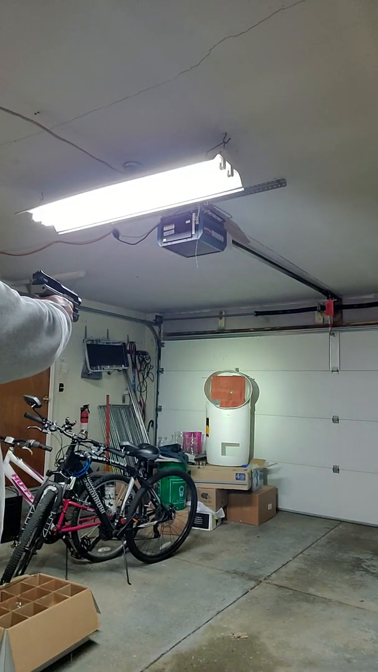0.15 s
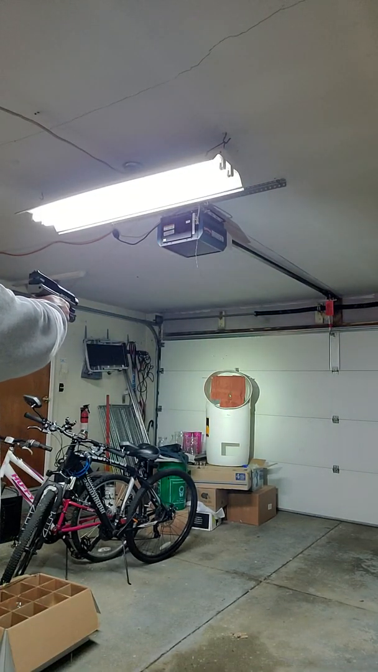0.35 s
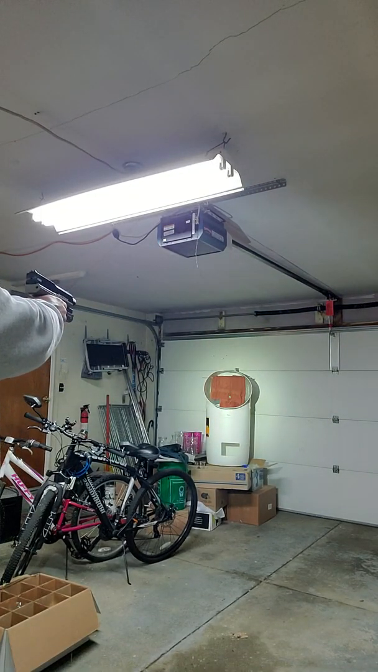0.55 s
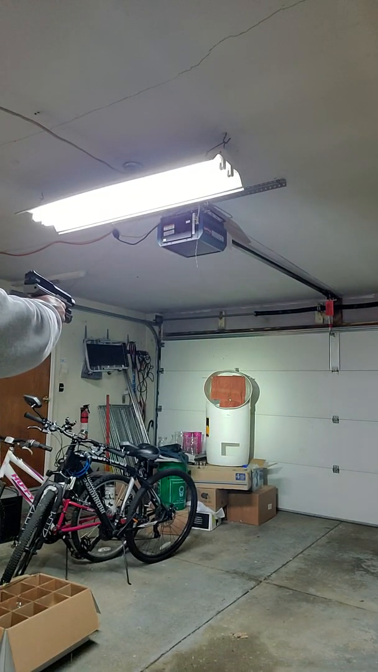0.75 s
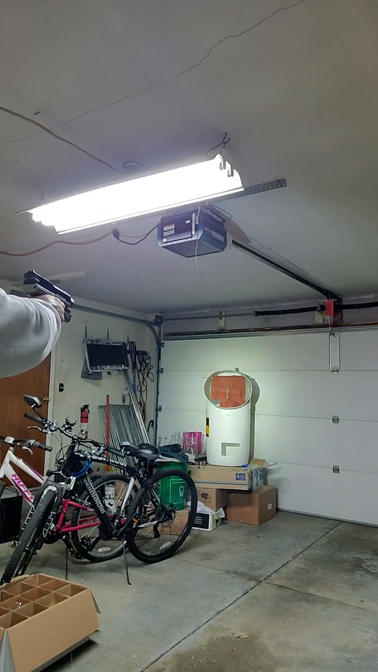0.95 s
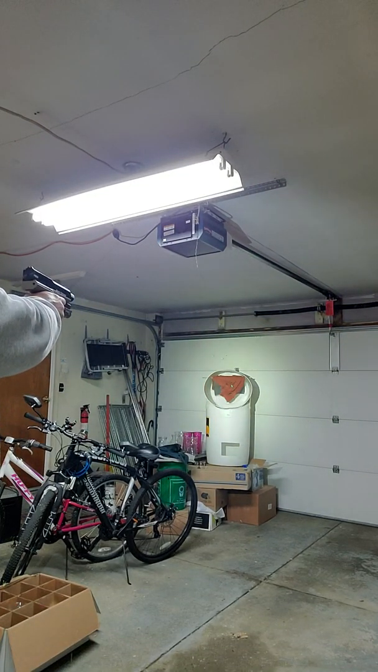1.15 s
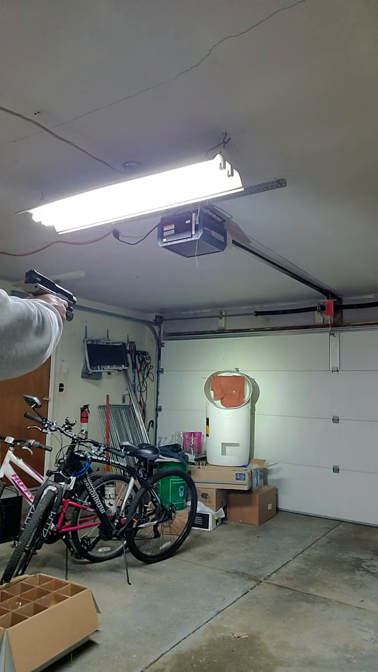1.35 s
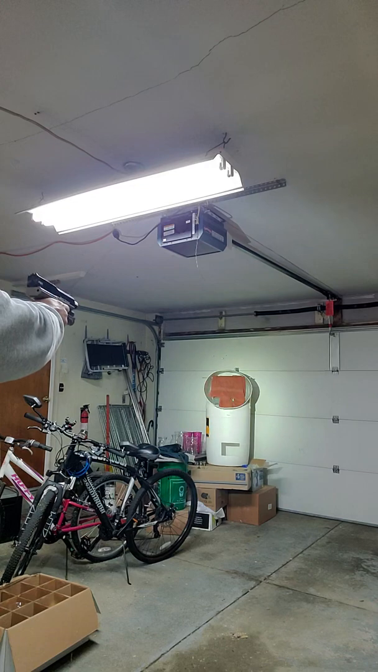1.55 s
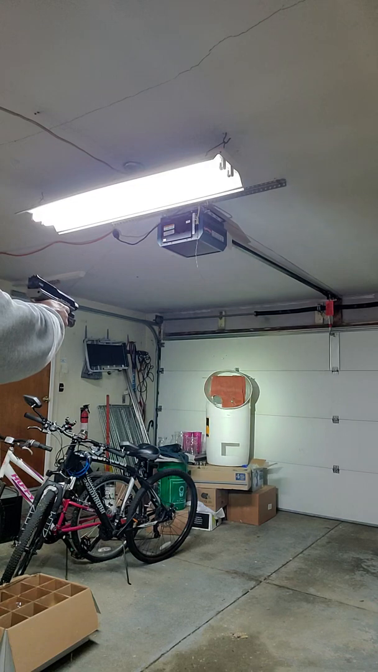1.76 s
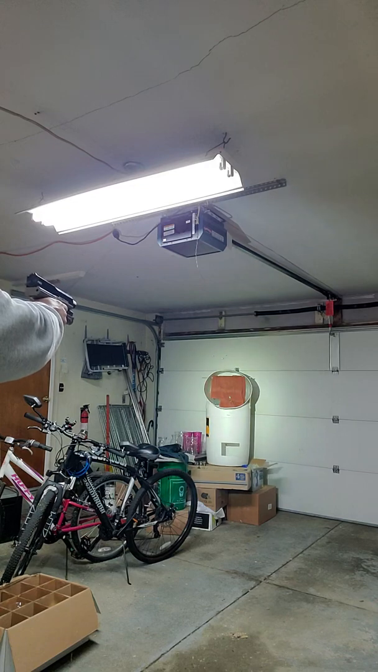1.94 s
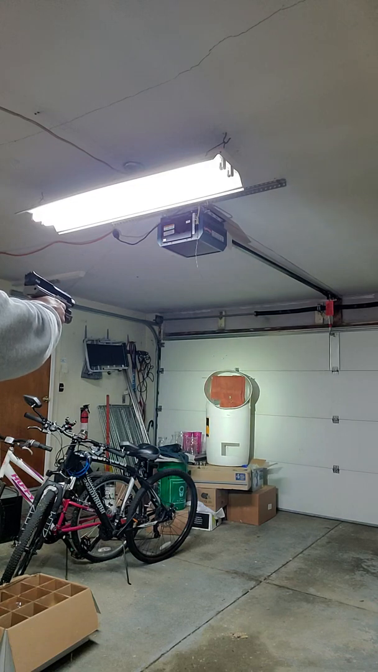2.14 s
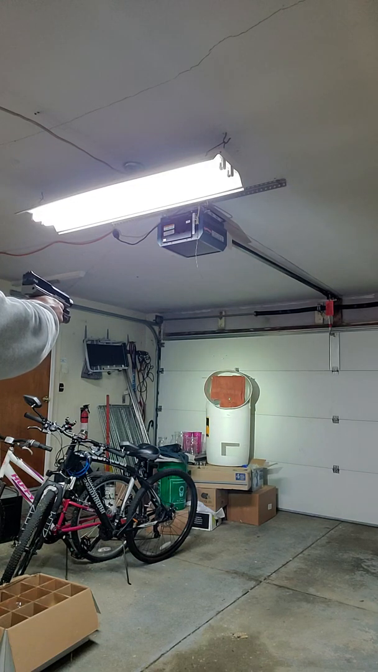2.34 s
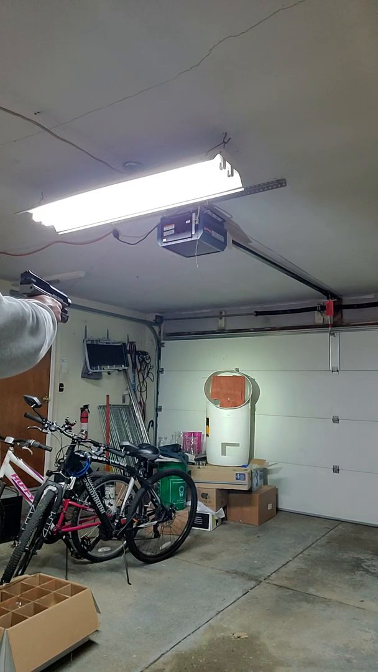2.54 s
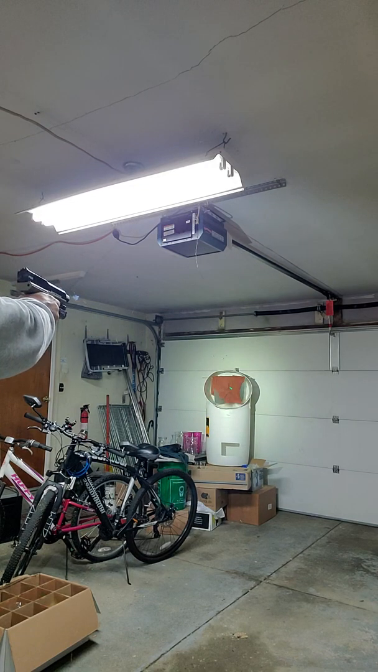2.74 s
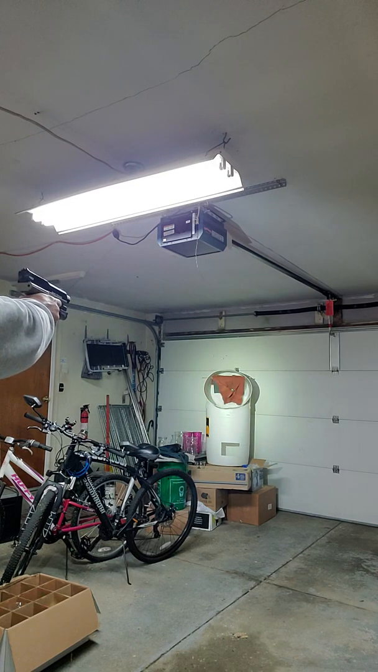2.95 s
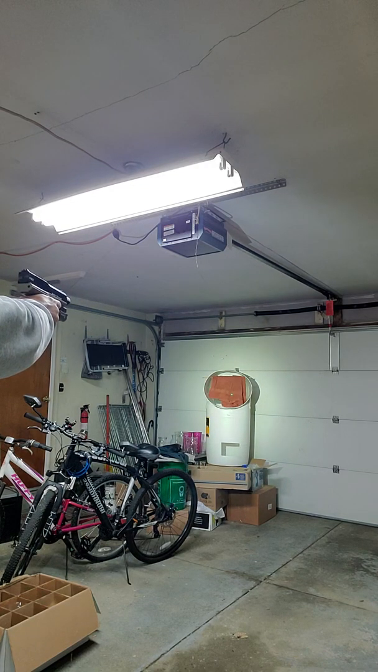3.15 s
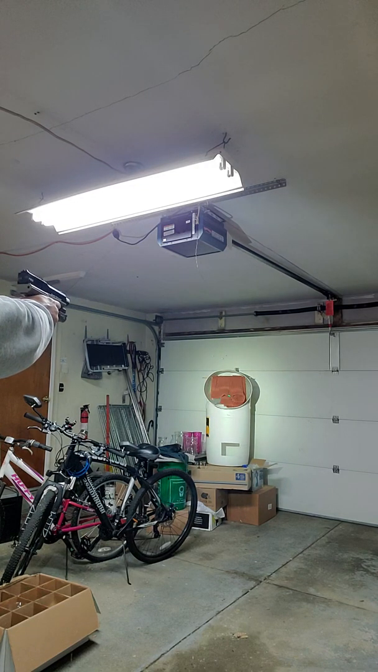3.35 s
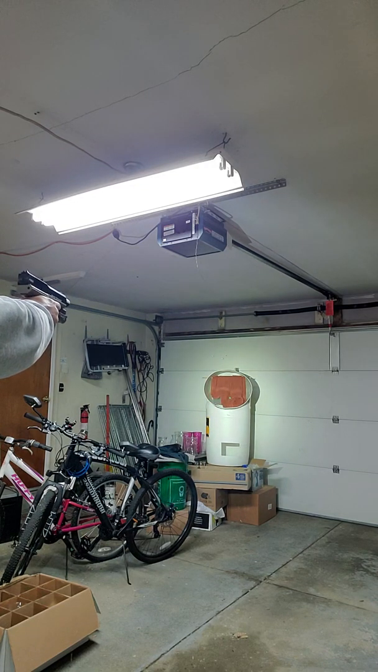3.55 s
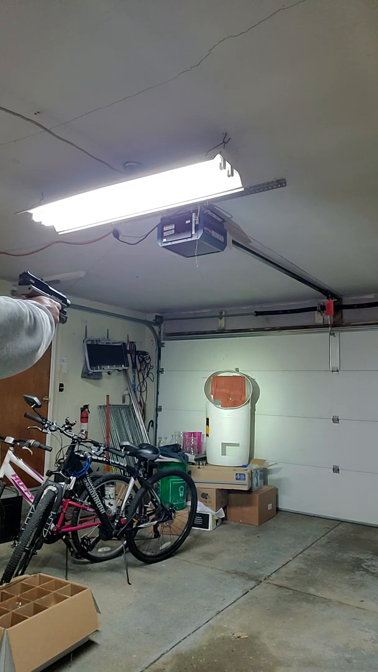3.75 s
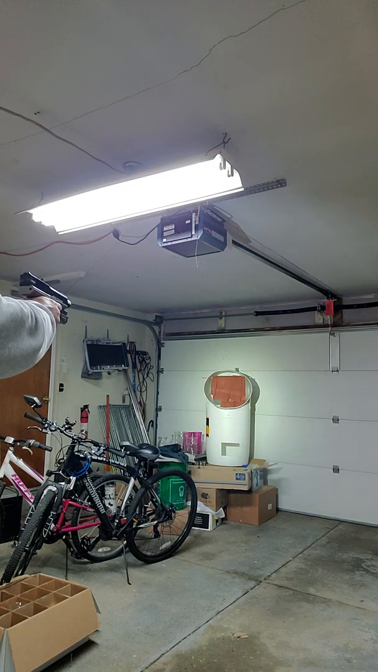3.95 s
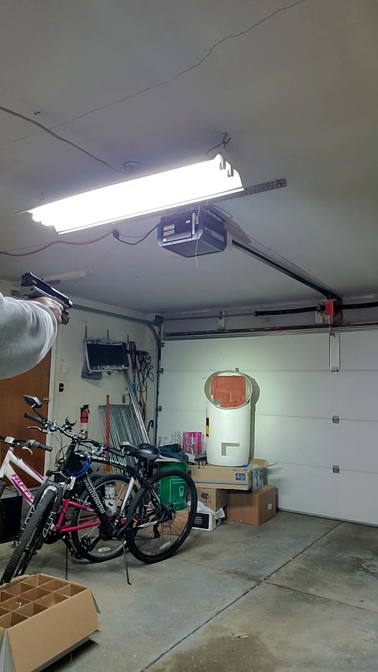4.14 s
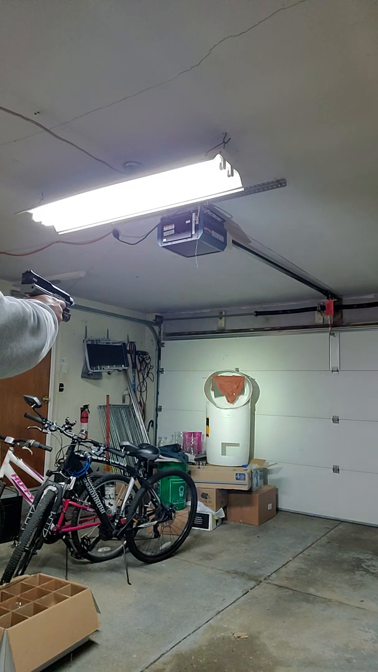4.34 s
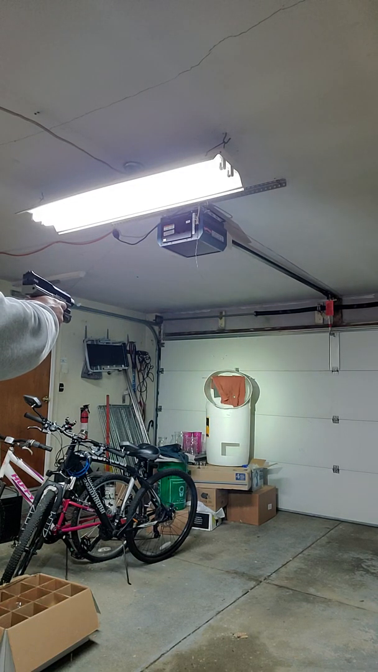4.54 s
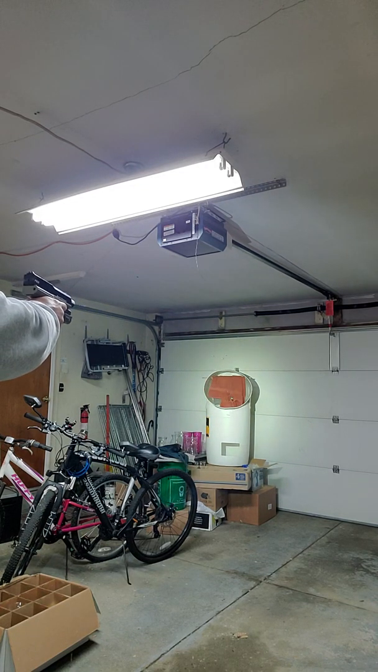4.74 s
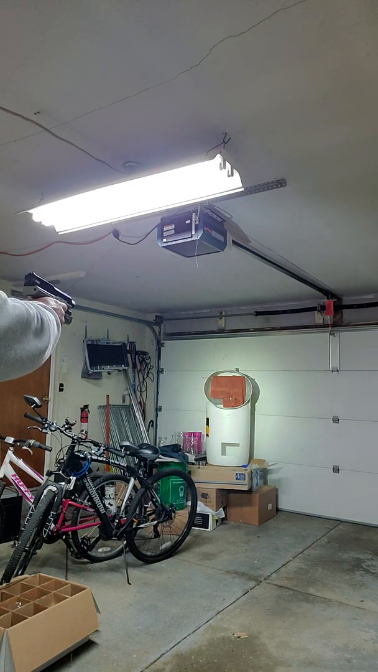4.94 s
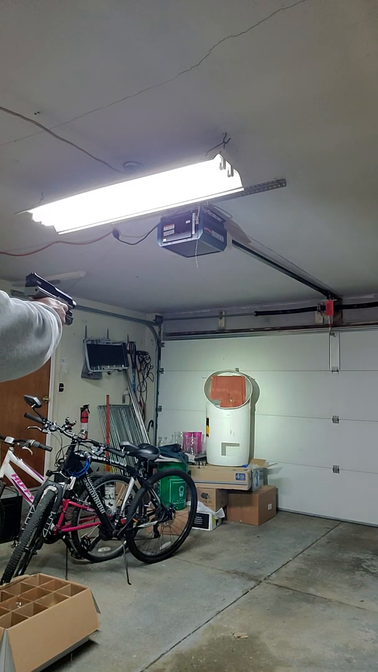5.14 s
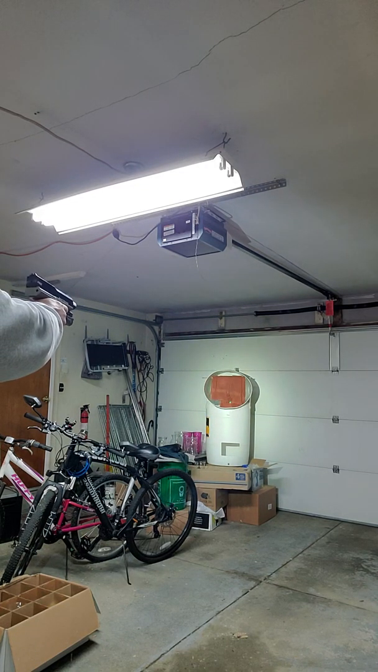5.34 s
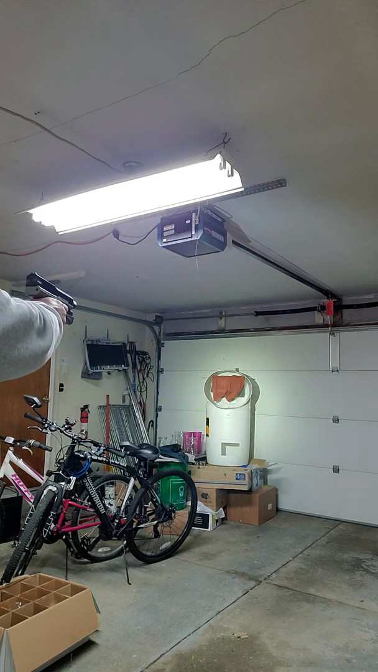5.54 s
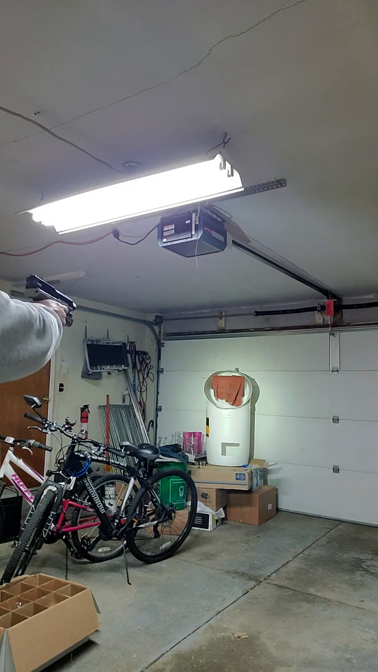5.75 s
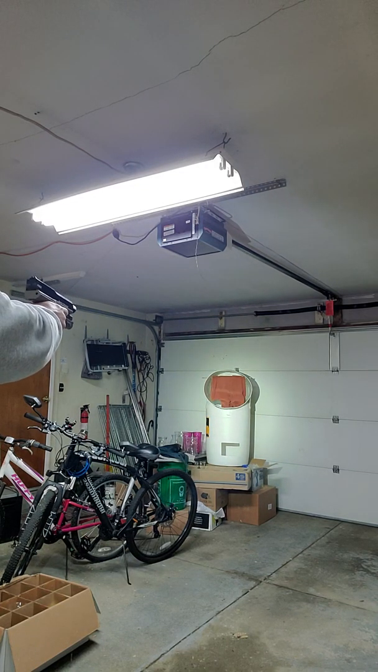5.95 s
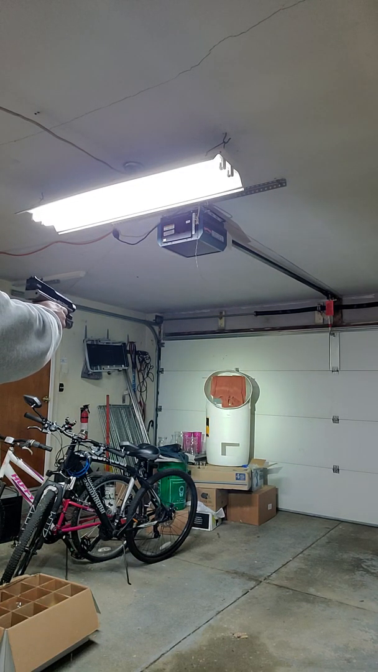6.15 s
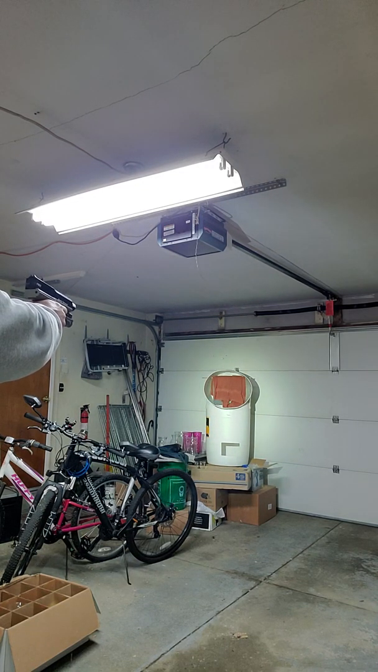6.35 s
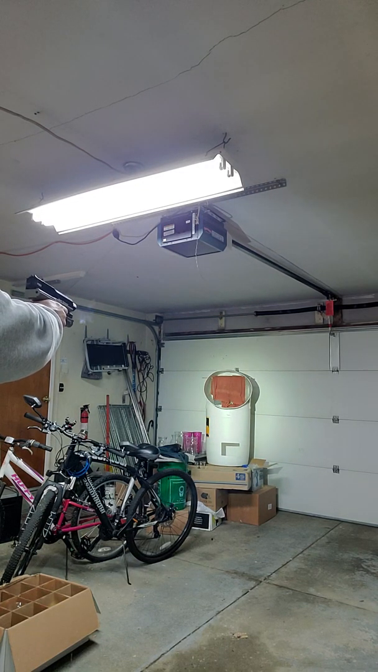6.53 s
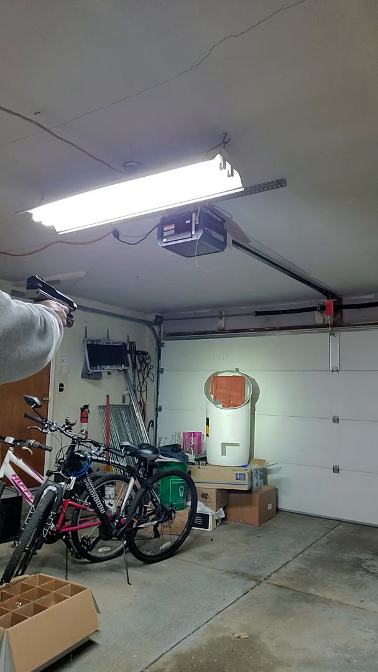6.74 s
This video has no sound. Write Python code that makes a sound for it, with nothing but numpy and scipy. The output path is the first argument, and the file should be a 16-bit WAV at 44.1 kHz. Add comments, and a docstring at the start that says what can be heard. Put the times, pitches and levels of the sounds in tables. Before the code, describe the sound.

Over faint room air and lamp hum, a nearby air pistol cracks five times, a little sooner each time, with a short, hard garage echo. Between shots its mechanism clicks, snaps and knocks as it is worked. A quick rebound follows the second and fourth shots, a hollow thump comes just before the fourth, and the fifth is fuller and brighter with a strong spit of gas.

```python
"""Five sharp cracks ring through a closed garage: a gas pistol, fired at arm's length.
Each shot is a crack and a spit of gas that the far door slaps back. Between shots the action
clicks, snaps and knocks as it is worked. The bare room rings after everything,
over a low wash of air and a faint hum of lamps."""
import sys
import numpy as np
from scipy import signal
from scipy.fft import rfft, irfft
from scipy.io import wavfile

SR = 44100
rng = np.random.default_rng(int(sys.argv[2]) if len(sys.argv) > 2 else 0)


def dump(signal):
    """Clip the signal to [-1, 1] and save it as 16-bit WAV at the path in sys.argv[1]."""
    limited = np.clip(np.atleast_2d(signal).T, -1, 1)
    pcm = np.round(limited * 32767).astype(np.int16)
    wavfile.write(sys.argv[1], SR, pcm)


N = 299483
T = np.arange(SR) / SR  # one second, the life of a sound
HZ = np.fft.rfftfreq(SR, 1 / SR)


def shots(crack_db=4, crack_s=0.0033, hiss_s=0.02, swell_s=0.0055, modes_db=-1):
    """The valve opens with a crack and a spit of gas; the door facing the muzzle throws the blast back."""
    # (time [s], level [dB], gas surplus [dB], door echo [dB], echo delay [s], swell [dB], valve [Hz])
    cues = [(0.9916, -14, 1.5, -3, .025, 2.5, 2120), (2.692, -15, 3, -2, 0.027, 1, 2780),
            (4.167, -14.5, 1, -2, .0265, 0, 3200), (5.392, -12, -1.5, -9, .028, -8, 2600),
            (6.446, -13, 10.5, -11.5, .024, -3, 5670)]
    # EQ of each layer: (frequency [Hz], level [dB])
    blast_eq = [(25, -25), (55, -27), (72, -6), (115, 2), (165, -1), (270, 2.5), (370, -1), (600, 0),
                (1200, -2.5), (3300, -4), (7100, -6), (8300, -13.5), (12000, -5.5), (16000, -13.5)]
    hiss_eq = [(500, -20.5), (3000, -15.5), (6500, 7), (8500, 3), (12500, 10), (16000, 8.5)]
    slap_eq = [(60, -15.5), (200, -7), (370, 4.5), (560, -7), (750, 0), (1200, 2), (1700, -1.5),
               (2800, -8.5), (4500, -13.5), (8000, -26), (16000, -36)]
    swell_eq = [(100, -3.5), (400, -2.5), (2000, -5), (3600, 0), (5200, -14), (8000, -18.5), (16000, -24)]
    out, near_paths, far_paths = np.zeros((2, N)), stereo_noise(SR), stereo_noise(SR)
    muzzle = fronts([(.0005, 7.2), (.0025, 21), (.006, 13)])
    door = fronts([(.0005, 25.8), (.0017, 25), (.0042, 19), (.009, 13)])
    modes = standing_waves()
    frame = frame_resonances(depth_db=3.4, spacing_hz=65)
    for s, db, gas_db, door_db, door_s, swell_db, valve_hz in cues:
        # more gas makes a shot deeper, brighter and hissier
        bass_db, treble_db, hiss_db = 0.77 * gas_db - .3, gas_db - 4, .95 * gas_db - 10
        voice = frame + resonance(valve_hz, width_hz=450, db=4.5)
        crack = muzzle + amp(crack_db) * stereo_noise(SR) * np.exp(-T / crack_s)
        near_room = garage(near_paths, moved=0.61, rise_s=0.0045, early=0.11, early_s=0.036)
        blast = colour(crack + near_room, curve(blast_eq) + shelves(bass_db, treble_db) + voice)
        hiss = colour(stereo_noise(SR) * np.exp(-T / hiss_s), curve(hiss_eq) + voice)
        far_room = garage(far_paths, moved=0.5, rise_s=0.0048, early=0.79, early_s=0.015)
        slap = colour(door + far_room, curve(slap_eq) + shelves(2.5 * bass_db, 0, bass_hz=700) + voice)
        swell = colour(stereo_noise(SR), curve(swell_eq) + voice) * np.exp((T - 1) / swell_s)
        add(out, s, amp(db) * (blast + amp(hiss_db) * hiss + amp(modes_db) * modes))
        add(out, s + door_s, amp(db + door_db) * slap)
        add(out, s - 1, amp(db + swell_db) * swell)  # peaks right at the crack
    return out


def hammer_snaps():
    """The hammer snaps back with a hard clack."""
    # (time [s], level [dB], ring [Hz], ring [dB])
    cues = [(-.13, -24, 640, 4.5), (1.876, -23.5, 2880, 6.5), (2.306, -20.5, 2276, 4),
            (3.468, -18, 870, 3.5), (6.011, -18, 1020, 5.5)]
    # body of a snap: (frequency [Hz], level [dB])
    eq = [(55, -42.5), (115, -13.5), (160, -18), (370, -19.5), (460, -0.5), (540, -8.5), (800, -0.5),
          (1150, 2), (1600, -5), (3200, -6), (6500, -13.5), (8500, -21), (12000, -18), (16000, -31.5)]
    hits = by_force(cues, plain_db=-22, bass_slope=2.9, treble_slope=2)
    return blows(hits, eq, ring_width_hz=310, direct_db=13.5, chatter_db=-4, ping_db=-12,
                 rise_s=0.01, early=2.8, early_s=0.026)


def trigger_clicks():
    """Trigger and catch click lightly; the mechanism adds faint, thin ticks."""
    # clicks: (time [s], level [dB], ring [Hz], ring [dB])
    cues = [(1.642, -31, 1090, 0), (3.320, -28, 844, 10), (4.853, -26, 806, 7.5), (5.887, -26, 914, 9.5),
            (5.945, -40.5, 890, 1)]
    # ticks: (time [s], level [dB])
    ticks = [(.349, -71), (5.794, -48)]
    # their thin tone: (bass [dB], treble [dB], ring [Hz], ring [dB])
    tick_tone = (-19.5, 7, 5807, 8)
    # body of both: (frequency [Hz], level [dB])
    eq = [(60, -36.5), (125, -20), (300, -3), (600, 1), (1000, 7), (1250, 5), (1600, -3.5), (3300, -9),
          (6000, -15.5), (8300, -20), (12000, -16), (16000, -29)]
    hits = by_force(cues, plain_db=-37, bass_slope=0.0896, treble_slope=0.77)
    hits += [(*tick, *tick_tone) for tick in ticks]
    return blows(hits, eq, ring_width_hz=150, direct_db=13, chatter_db=-3, ping_db=-10,
                 rise_s=0.01, early=1.97, early_s=0.026)


def loose_knocks():
    """The pistol's loose parts knock dully together."""
    # (time [s], level [dB], ring [Hz], ring [dB])
    cues = [(.040, -52, 616, 15), (.113, -48, 1225, 6), (.365, -64, 1193, 10), (1.724, -28, 1650, 2),
            (3.605, -32, 3550, 2), (4.100, -63, 1110, 7.5), (4.929, -41.5, 1160, 16),
            (6.227, -30.5, 1146, 5.5), (6.307, -37.5, 1730, -16)]
    # body of a knock: (frequency [Hz], level [dB])
    eq = [(50, -42.5), (120, -11), (400, -5.5), (750, -3), (1200, 1), (2000, -3.5), (3200, -4), (5000, -10),
          (8500, -19.5), (12000, -17), (16000, -30.5)]
    hits = by_force(cues, plain_db=-23, bass_slope=0.41, treble_slope=1.4)
    return blows(hits, eq, ring_width_hz=180, direct_db=-3, chatter_db=4, ping_db=0.5,
                 rise_s=.016, early=0.93, early_s=0.029, chatter_s=0.0079)


def rebounds():
    """Something bounces back just after two of the shots, perhaps the pellet."""
    # (time [s], level [dB], bass [dB], treble [dB], ring [Hz], ring [dB])
    hits = [(2.802, -22, 9.5, 8, 348, -4), (5.526, -17.5, -4.5, -4.5, 820, 12)]
    # body of a bounce: (frequency [Hz], level [dB])
    eq = [(50, -22), (75, -13), (120, -2), (350, 4.5), (550, -5.5), (1100, 2), (1700, -3), (3200, -7.5),
          (5000, -8), (8500, -15.5), (12000, -10.5), (16000, -21)]
    return blows(hits, eq, ring_width_hz=98, direct_db=12, chatter_db=-1, ping_db=-15.5,
                 rise_s=0.01, early=.6, early_s=0.066)


def grip_thump():
    """The grip gives one hollow thump."""
    # (time [s], level [dB], bass [dB], treble [dB], ring [Hz], ring [dB])
    hits = [(5.305, -19, -9, 2.5, 380, 7.5)]
    # body of the thump: (frequency [Hz], level [dB])
    eq = [(50, -42), (110, -5.5), (230, -13), (300, 0.5), (450, -1), (680, -3.5), (900, -23), (1300, -21.5),
          (2200, -33.5), (5000, -45), (8500, -54), (12000, -40.5), (16000, -53)]
    return blows(hits, eq, ring_width_hz=89, direct_db=15, chatter_db=-3, ping_db=-17,
                 rise_s=0.0019, early=0.93, early_s=0.035)


def blows(hits, eq, ring_width_hz, direct_db, chatter_db, ping_db, rise_s, early, early_s,
          chatter_s=0.014, ping_t60=0.11):
    """Hard parts collide: a tick, a brief chatter and a ping, then the room."""
    out, paths = np.zeros((2, N)), stereo_noise(SR)
    for s, db, bass_db, treble_db, ring_hz, ring_db in hits:
        room = garage(paths, moved=1.4, rise_s=rise_s, early=early, early_s=early_s)
        tick = fronts([(.0003, direct_db), (.009, 14)])  # direct, then off the ceiling
        tone = curve(eq) + shelves(bass_db, treble_db) + resonance(ring_hz, ring_width_hz, ring_db)
        tone += frame_resonances(depth_db=3, spacing_hz=80)
        burst = stereo_noise(SR) * (1 - np.exp(-T / 0.0025)) * np.exp(-T / chatter_s)
        chatter = colour(burst, tone + resonance(ring_hz, 0.41 * ring_hz, 14))
        # the struck part's own note, reaching each side at its own phase
        ping = np.sin(2 * np.pi * (ring_hz * T + rng.random((2, 1)) / 4)) * (1 - np.exp(-T / 0.0014))
        ping *= amp(ping_db + ring_db - 60 * T / ping_t60)
        add(out, s, amp(db) * (colour(tick + room, tone) + amp(chatter_db) * chatter + ping))
    return out


def by_force(cues, plain_db, bass_slope, treble_slope):
    """A harder blow is fuller and brighter: bass and treble rise with each dB above a plain one."""
    return [(s, db, bass_slope * (db - plain_db), treble_slope * (db - plain_db), ring_hz, ring_db)
            for s, db, ring_hz, ring_db in cues]


def frame_resonances(depth_db, spacing_hz):
    """The hollow frame's many small resonances: random peaks and gaps in dB, strongest in the mids."""
    knots = np.arange(0, SR, spacing_hz)
    heights = np.clip(rng.standard_normal(SR // 8), -2, 2)[:len(knots)]
    return depth_db * np.interp(HZ, knots, heights) * curve([(200, 0), (700, 1), (4000, 1), (12000, .6)])


def fronts(arrivals):
    """Sharp pressure fronts (delay [s], level [dB]) reach left and right a hair apart."""
    out = np.zeros((2, SR))
    for (delay, db), lag in zip(arrivals, rng.integers(0, 7, (len(arrivals), 2))):
        out[[0, 1], round(delay * SR) + lag] += amp(db)
    return out


def garage(paths, moved, rise_s, early, early_s):
    """The room's reverb: shared reflection paths, changed by how far the hand has moved."""
    # decay of the bare room: (band centre [Hz], t60 [s])
    decays = [(80, .52), (250, 0.57), (600, 0.69), (1200, 0.56), (2500, 0.7), (5000, .6), (8000, 0.42),
              (15000, 0.29)]
    centres, t60s = np.transpose(decays)
    spectrum = rfft((paths + moved * stereo_noise(SR)) / np.hypot(1, moved))
    tail = sum(irfft(spectrum * curve(np.c_[centres, band])) * amp(-60 * T / t60)
               for band, t60 in zip(np.eye(len(t60s)), t60s))
    # reflections arrive in clumps at first and even out later
    clumps_db = 2.4 * np.interp(T, np.linspace(0, 1, 400), rng.standard_normal(400)) * np.exp(-T / .15)
    # the ceiling and the near wall crowd the first moments
    crowding = 1 + early * np.exp(-T / early_s)
    return tail * amp(clumps_db) * (1 - np.exp(-T / rise_s)) * crowding


def standing_waves():
    """Room modes build up as the blast crosses the garage, then ring out."""
    # (frequency [Hz], level [dB], t60 [s])
    modes = [(78, -15.5, 0.18), (110.3, -19.5, 0.67), (254.8, -20, 0.4), (330, -15, .55),
             (364.5, -5.5, 0.5), (423, -11, 0.42), (480.6, -14, .6), (595, -14, 0.55), (704.6, -7, 0.29),
             (735, -13, 0.32), (1027, -18.5, 0.36), (1267, -11.5, 0.19)]
    waves = sum(amp(db - 60 * T / t60) * np.sin(2 * np.pi * (hz * T + rng.random()))
                for hz, db, t60 in modes)
    return waves * (1 - np.exp(-T / 0.0081))


def room_tone(air_db=-57.5):
    """A low, steady bed of air under the hum of the lamps."""
    # still air: (frequency [Hz], level [dB])
    air_eq = [(25, -15.5), (60, -20), (105, -5), (160, -6.5), (220, -5), (330, -9), (480, -17),
              (750, -14.5), (950, -22.5), (1700, -29.5), (3000, -47), (6000, -59.5), (16000, -57)]
    # lamp hum: (frequency [Hz], level [dB])
    partials = [(118.4, -63), (209.9, -64.5), (242.2, -72), (290.7, -66.5), (570.6, -68), (689.1, -74),
                (812.9, -72)]
    air = irfft(rfft(stereo_noise(N)) * amp(curve(air_eq, np.fft.rfftfreq(N, 1 / SR))), N)
    t = np.arange(N) / SR
    hum = sum(amp(db) * np.sqrt(2) * np.sin(2 * np.pi * (hz * t + rng.random())) for hz, db in partials)
    return amp(air_db) * air / air.std() + hum


def stereo_noise(size):
    """Noise arriving from all sides: centred in the bass, wide in the treble."""
    # (frequency [Hz], left-right likeness [ratio, capped at 1])
    likeness = [(60, 1.3), (125, 1.3), (250, 0.93), (500, .5), (1000, 0.06), (2000, 0.04), (4000, -0.0047),
                (12000, 0)]
    left, other = rfft(rng.standard_normal((2, size)))
    same = np.clip(curve(likeness, np.fft.rfftfreq(size, 1 / SR)), -1, 1)
    right = same * left + np.sqrt(1 - same ** 2) * other
    return irfft(np.array([left, right]), size)


def colour(x, db):
    """Minimum-phase EQ of unit power, shaped by a dB curve."""
    gain = amp(db) / np.sqrt(np.mean(amp(db) ** 2))
    log_gain = np.log(np.r_[gain, gain[-2:0:-1]] + 1e-6)
    taps = np.fft.ifft(np.exp(np.conj(signal.hilbert(log_gain)))).real[:4096]
    return signal.fftconvolve(x, taps[None], axes=1)[:, :SR]


def shelves(bass_db, treble_db, bass_hz=350, treble_hz=4500):
    """Low and high shelves in dB: the weight and hardness of a hit."""
    return bass_db / (1 + (HZ / bass_hz) ** 2) + treble_db * HZ ** 2 / (HZ ** 2 + treble_hz ** 2)


def resonance(hz, width_hz, db):
    """One bell curve in dB."""
    return db / (1 + (2 * (HZ - hz) / width_hz) ** 2)


def curve(points, hz=HZ):
    """Joins (frequency [Hz], value) points on a log-frequency axis."""
    f, value = np.transpose(points)
    return np.interp(np.log(hz + 1), np.log(f + 1), value)


def amp(db):
    """Decibels to gain."""
    return 10 ** (np.asarray(db) / 20)


def add(mix, s, sound):
    """Lays a stereo sound into the mix at time s."""
    start = round(s * SR)
    sound = sound[:, max(-start, 0):]
    part = mix[:, max(start, 0):][:, :sound.shape[1]]
    part += sound[:, :part.shape[1]]


def scene():
    """Shots and handling, brighter on the right, over the room tone."""
    # stereo tilt: (frequency [Hz], left minus right [dB])
    balance = [(250, 0.5), (1000, -1.5), (2000, -0.5), (4000, -3), (8000, -3), (12000, -7)]
    pistol = shots() + hammer_snaps() + trigger_clicks() + loose_knocks() + rebounds() + grip_thump()
    hz = np.fft.rfftfreq(N, 1 / SR)
    spectrum = rfft(pistol) * amp(curve(balance, hz) * np.array([[.5], [-.5]]))
    middle = spectrum.mean(0)
    sides = (spectrum - middle) * hz / np.hypot(hz, 120)  # long waves press on both sides alike
    return irfft(middle + sides, N) + room_tone()


def record(dry):
    """A soft clip rounds the loudest peaks; a low-pass trims the top at 16 kHz."""
    rounded = dry / (1 + dry ** 6) ** (1 / 6)
    lowpass = signal.firwin(301, 16000, window=("kaiser", 11), fs=SR)
    return signal.oaconvolve(rounded, lowpass[None], "same")


dry = scene()
out = record(dry)
dump(out)
```